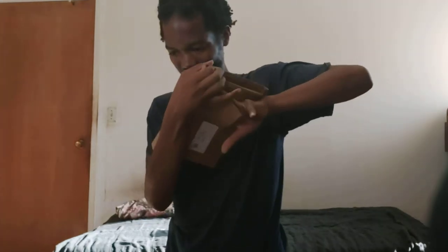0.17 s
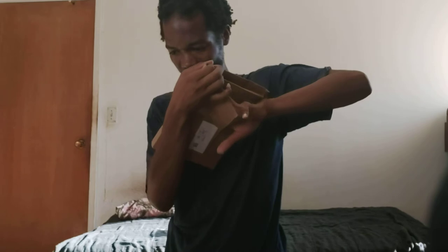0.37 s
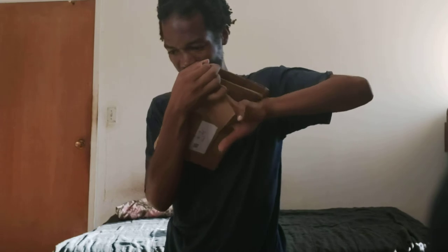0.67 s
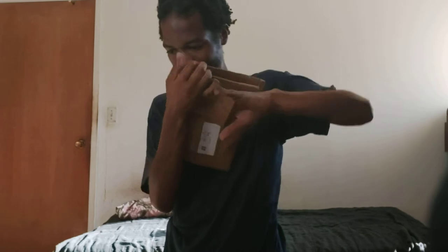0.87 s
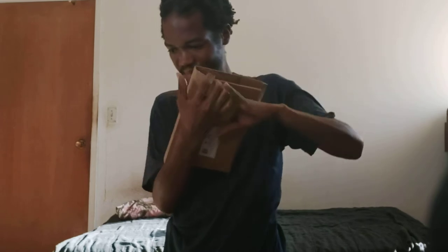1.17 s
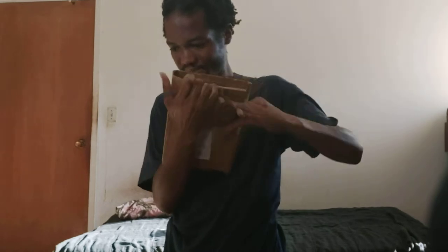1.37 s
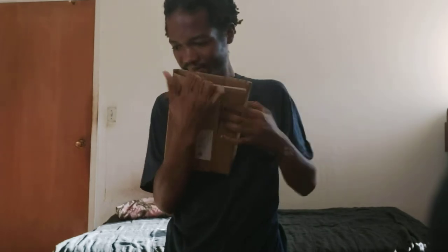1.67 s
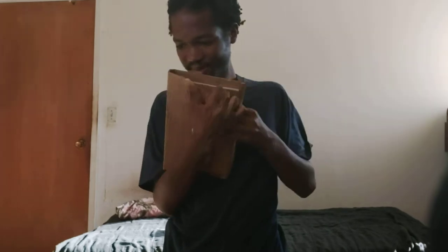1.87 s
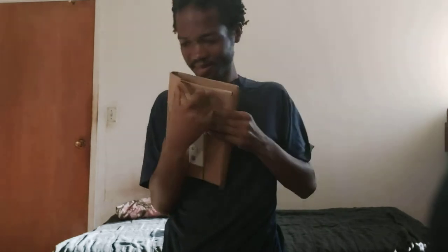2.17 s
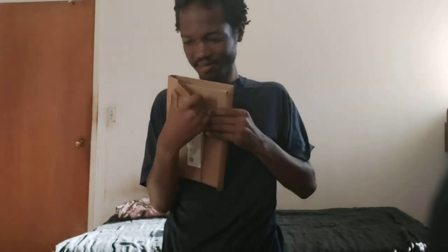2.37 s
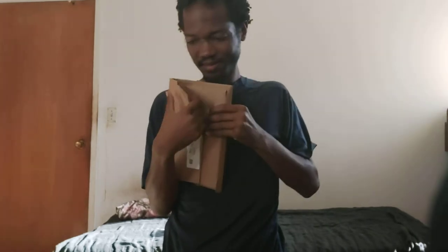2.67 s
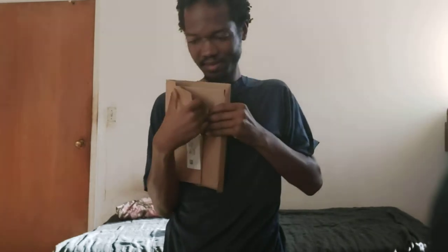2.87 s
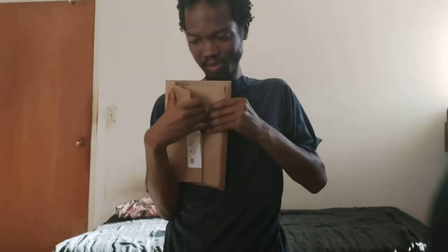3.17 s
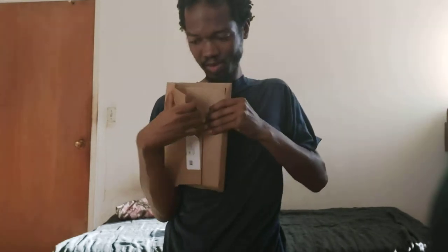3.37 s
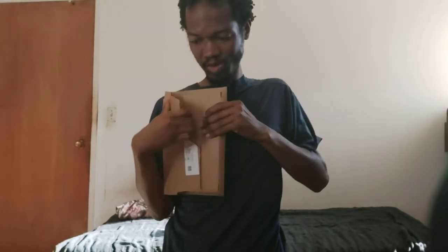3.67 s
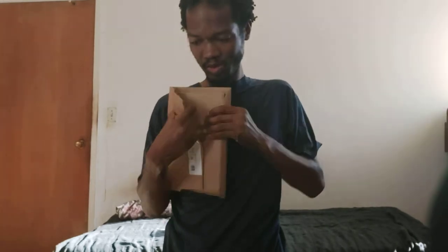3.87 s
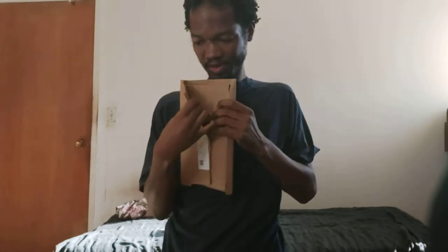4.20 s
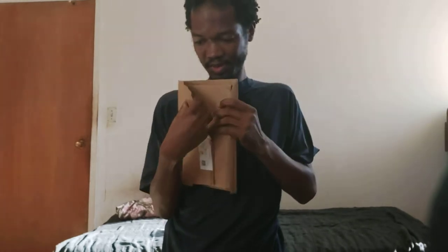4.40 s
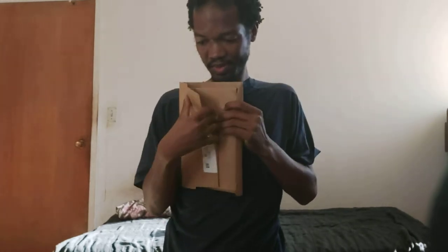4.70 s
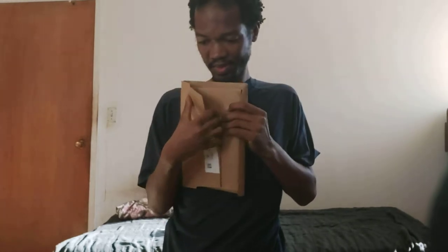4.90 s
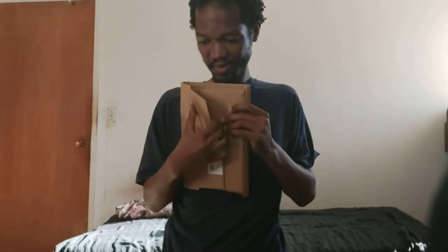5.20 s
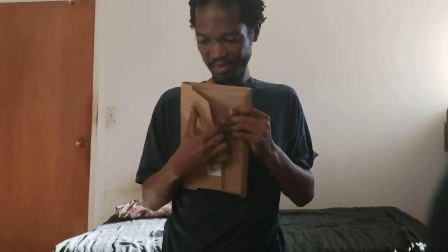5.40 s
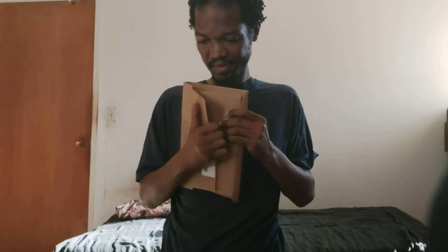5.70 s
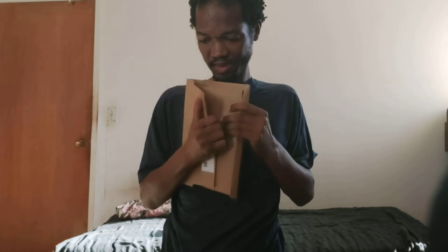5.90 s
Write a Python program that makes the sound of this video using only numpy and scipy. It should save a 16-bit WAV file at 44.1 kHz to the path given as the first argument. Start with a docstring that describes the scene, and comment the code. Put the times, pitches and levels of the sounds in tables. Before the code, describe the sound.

Stiff cardboard being worked open by hand: short fibrous rasps, dry clicks of letting-go glue and boxy low knocks from the panel, unevenly spaced with near-quiet gaps. One strong ripping burst stands out after halfway, then a hard crack, then lighter picking. The sound is mid-heavy with dulled top treble, heard at a short distance with quick wall slaps and a short room tail over low rumble, hum and hiss.

```python
"""Tearing open a cardboard mailer

Hands tear and pry at the board in a small bare-walled bedroom, two metres from a laptop microphone.
Fibres rip in swarms of tiny cracks; glue and creases let go in single snaps; the panel thumps and rustles.
Impulsive drives ring banks of resonances, and the room adds early slaps and a short tail.
Mains hum, a low rumble and hiss lie underneath."""
import sys
import numpy as np
from scipy import signal
from scipy.fft import rfft, irfft
from scipy.io import wavfile
from scipy.ndimage import uniform_filter1d

SR = 44100
rng = np.random.default_rng(int(sys.argv[2]) if len(sys.argv) > 2 else 0)


def int16_out(signal):
    """Quantize to a 16-bit WAV file."""
    q = np.round(np.clip(np.atleast_2d(signal).T, -1, 1) * 32767)
    wavfile.write(sys.argv[1], SR, q.astype(np.int16))


N = 266805

# Bending resonances of the cardboard panel: (frequency [Hz], width [Hz], level [dB])
PANEL_MODES = [(135, 50, -13), (174, 110, -9), (252, 11, -22), (338, 47, -25), (494, 24, -11),
               (566, 178, -6), (752.5, 71, -7.5), (842, 68, -6.5), (960, 130, -2.5), (1367, 430, 2.5)]


def tearing():
    """Crackling noise: one swarm of breaking fibres drives fizz, rasp and top; jolts drive the panel modes."""
    # Pulls and slides of the hands: (start [s], swell [s], hold [s], fade [s], fizz drive [dB],
    # rasp drive against fizz [dB], panel rustle drive [dB], centre of the rustle [Hz])
    hand_strokes = [(0.0, 0.00039, 0.0034, 0.027, -33.5, -11, -48, 790),
                    (0.095, 0.092, 0.085, 0.097, -31.5, -19, -58.5, 1010),
                    (0.359, 0.025, 0.075, 0.14, -43.5, -19.5, -71, 830),
                    (0.595, 0.068, 0.018, .05, -55, -19.5, -76, 816),
                    (0.731, 0.03, 0.021, 0.066, -52.5, -3.5, -45, 414),
                    (0.826, 0.043, 0.072, 0.18, -45.5, -5.5, -58, 760),
                    (1.284, 0.037, 0.061, 0.044, -45.5, -1.5, -53, 729),
                    (1.344, 0.063, .02, 0.078, -34, -9, -49.5, 680),
                    (1.544, 0.04, 0.15, 0.062, -56, -4, -54.5, 680),
                    (1.72, 0.073, 0.092, .2, -45.5, -8, -56, 800),
                    (1.966, 0.042, 0.022, 0.21, -51, -6.5, -62, 740),
                    (2.22, 0.054, 0.058, 0.068, -49, -9.5, -57, 680),
                    (2.435, 0.025, 0.012, 0.039, -63.5, -12, -73, 724),
                    (2.591, 0.052, .02, 0.13, -46.5, -6, -55, 570),
                    (2.993, 0.12, 0.077, .05, -60.5, -9.5, -74, 650),
                    (3.225, .012, 0.08, .03, -41.5, -25, -90, 800),
                    (3.311, 0.014, 0.082, 0.02, -27, -19.5, -52, 800),
                    (3.402, 0.049, 0.0079, 0.085, -17.5, -13, -35, 680),
                    (3.778, 0.07, 0.26, 0.052, -58, -5.5, -66.5, 825),
                    (4.032, 0.034, 0.052, 0.19, -48, -11.5, -66.5, 840),
                    (4.244, 0.0061, 0.029, .12, -35.5, -8.5, -40.5, 560),
                    (4.473, 0.031, 0.081, 0.055, -59, 1.5, -61, 700),
                    (4.594, 0.018, 0.008, .1, -47.5, -15, -41, 450),
                    (4.842, 0.0036, 0.0045, 0.063, -40.5, -12, -61, 740),
                    (5.01, 0.047, 0.0076, 0.046, -46, -6, -52, 530),
                    (5.202, .08, 0.0088, 0.027, -54.5, -10, -61, 600),
                    (5.34, 0.017, .01, 0.083, -51, -7.5, -57, 580),
                    (5.445, 0.039, 0.45, 0.065, -63, -4.5, -69.5, 750),
                    (5.704, 0.19, 0.074, .05, -46.5, -13, -65, 650),
                    (5.968, 0.087, .01, .05, -31, -8.5, -47.5, 650)]
    top_slope, top_offset_db = 1.366, -18.5  # the top crackle grows faster than the fizz [dB per dB], [dB]
    t = np.arange(0, N / SR, .002)
    modes_hz = np.transpose(PANEL_MODES)[0]
    power = np.zeros((3 + len(PANEL_MODES), len(t)))
    for *times, fizz_db, rasp_db, panel_db, centre_hz in hand_strokes:
        shape_db = stroke(t, *times)
        fibre_db = shape_db + fizz_db
        top_db = top_slope * fibre_db + top_offset_db
        power[:3] += gain_of([fibre_db, fibre_db + rasp_db, top_db]) ** 2
        rustle = gain_of(shape_db + panel_db) * share(modes_hz, centre_hz)[:, None]
        power[3:] += rustle ** 2
    sample_t = np.arange(N) / SR
    level = np.array([np.interp(sample_t, t, np.sqrt(row)) for row in power])
    fibres = cracks(per_s=3000, spread_db=5.0, clump_db=2.5)
    jolts = cracks(per_s=1500, spread_db=4.5, clump_db=1.5)
    return np.vstack([level[:3] * fibres, level[3:] * jolts])


def stroke(t, start, swell, hold, fade):
    """Exponential growth and decay: a level [dB] that climbs to 0, holds, and falls in straight lines."""
    edge_db = 16.5  # change over one swell or fade time (taken as at least 1 ms)
    peak = start + swell
    rise = np.maximum(peak - t, 0) / max(swell, 1e-3)
    fall = np.maximum(t - peak - hold, 0) / max(fade, 1e-3)
    return -edge_db * (rise + fall)


def cracks(per_s, spread_db, clump_db):
    """Shot noise: random tiny breaks, a few of them large, whose strength swells in clumps; unit deviation."""
    size = gain_of(spread_db * np.minimum(rng.exponential(1, N), 5))
    signed_size = size * rng.choice([-1., 1.], N)
    breaks = rng.random(N) < per_s / SR
    clump = uniform_filter1d(uniform_filter1d(rng.standard_normal(N), 300), 300)
    x = signed_size * breaks * gain_of(clump_db * clump / clump.std())
    return x / x.std()


def snaps():
    """Impulsive release: each snap cracks briefly while the panel keeps jolting several times longer."""
    # Glue and creases letting go: (time [s], crack drive [dB], rasp drive against crack [dB],
    # panel thump drive [dB], centre of the thump [Hz])
    releases = [(0.084, -49, -10, -64, 1120), (0.1114, -27, -12, -48.5, 1250),
                (0.171, -26, -7, -43.5, 1440), (0.192, -24, -23, -39.5, 1410), (0.338, -20, -34, -59, 773),
                (0.3475, -35, -6, -55, 855), (0.388, -21, -30, -76, 1090), (0.4266, -30.5, -11, -53.5, 960),
                (0.4544, -29.5, -8.5, -52, 820), (0.757, -44, 1.5, -20.5, 207), (0.961, -30, -3, -52, 970),
                (1.0107, -35, -3.5, -36.5, 397), (1.3005, -55, 11, -46, 462), (1.3207, -37, -9, -48, 840),
                (1.366, -26, -8, -58, 920), (1.567, -50, -3, -56, 797), (1.6618, -48, -6, -46.5, 810),
                (1.7677, -37, 1, -40, 970), (2.023, -38, -17, -45.5, 930), (2.254, -59, 13, -56.5, 1000),
                (2.3152, -42, -26, -37, 640), (2.57, -50, -10, -38.5, 420), (2.6362, -33.5, -4, -27, 500),
                (2.7681, -42, -15, -46.5, 510), (2.9969, -42, -5, -69, 300), (3.088, -42.5, -7, -49.5, 543),
                (3.2324, -19, -19.5, -70, 800), (3.261, -28, -11.5, -75, 740),
                (3.268, -28.5, -14.5, -80, 740), (3.3019, -32, -6, -68, 805), (3.32, -21, 3, -64, 797),
                (3.337, -12, -1, -49, 1300), (3.3707, -12.5, 4.5, -43.5, 1030),
                (3.3828, -11, -1, -35.5, 820), (3.4098, -17, 7, -33, 720), (3.4279, -8, -9, -34.5, 720),
                (3.4441, -26.5, 12, -43, 731), (3.464, -12, -3.5, -21, 323), (3.5069, -29, -3, -35.5, 846),
                (3.7978, -42, -12, -57.5, 870), (3.887, -47, 2.5, -48.5, 770),
                (4.0497, -44, -1, -51.5, 770), (4.25, -7.5, -3.5, -23, 525), (4.4805, -34, 1, -59, 581),
                (4.5462, -26, -14.5, -64, 746), (4.578, -28, -12, -69, 638), (4.625, -32.5, 6, -26, 374),
                (4.8194, -53, -3.5, -61, 736), (4.8471, -19.5, -7.5, -33, 783),
                (5.0075, -49.5, 6, -39.5, 500), (5.1267, -46, -4, -38.5, 553),
                (5.177, -37.5, -7.5, -37.5, 555.6), (5.2304, -38, -3, -34, 564),
                (5.3608, -29.5, -10, -34.5, 549.4), (5.4837, -41, -2, -47.5, 507),
                (5.7156, -50, 9, -45, 1030), (5.8312, -44.5, -4, -73, 1080), (5.8661, -38, -20, -72, 800),
                (5.9013, -61, -17, -45, 480), (5.9649, -34, -21, -48, 799), (6.0174, -37, -1, -42.5, 820),
                (6.0377, -14.5, -30, -42, 509)]
    crack_ms, thump_ms = 0.54, 4.1  # decay time constants
    top_db = -47  # top crackle drive against the crack
    length = 4096
    drive = np.zeros((3 + len(PANEL_MODES), N + length))
    modes_hz = np.transpose(PANEL_MODES)[0]
    noises = rng.standard_normal((len(releases), length))
    for (s, crack_db, rasp_db, thump_db, centre_hz), noise in zip(releases, noises):
        at = round(s * SR)
        crack = blow(noise, crack_ms * SR / 1000)
        thump = blow(noise, thump_ms * SR / 1000)
        levels_db = [[crack_db], [crack_db + rasp_db], [crack_db + top_db]]
        drive[:3, at:at + length] += crack * gain_of(levels_db)
        drive[3:, at:at + length] += thump * gain_of(thump_db) * share(modes_hz, centre_hz)[:, None]
    return drive[:, :N]


def blow(noise, samples):
    """Impulse excitation: one sharp break followed by a weaker, exponentially dying burst."""
    burst = noise * np.exp(-np.arange(len(noise)) / samples)
    burst *= np.sqrt(samples / 4) / np.linalg.norm(burst)
    burst[0] = np.sqrt(samples)
    return burst


def share(hz, centre_hz):
    """Modal coupling: how strongly a grip that favours centre_hz drives the panel mode at hz."""
    octaves = np.log2(hz / np.clip(centre_hz, 100, 2000))
    return np.exp(-.5 * (octaves / .44) ** 2)


def fibre_sound(fizz, rasp, top):
    """Resonant filtering: the crack drives ring three banks of broad treble resonances."""
    # Resonances of each bank: (frequency [Hz], width [Hz], level [dB])
    fizz_modes = [(4128, 1460, -11.5), (5860, 2600, -7.5), (6950, 1350, -8), (7870, 860, -10.5)]
    rasp_modes = [(1522, 500, -6.5), (2140, 1200, -2.5), (2821, 740, -4), (2790, 330, -24.5)]
    top_modes = [(10020, 1330, 20.6), (14300, 1900, 19.4)]
    return ring(fizz, fizz_modes) + ring(rasp, rasp_modes) + ring(top, top_modes)


def panel_sound(drives):
    """Modal superposition: each panel mode rings to its own drive, and the modes add."""
    soft = signal.butter(2, 1750, fs=SR)  # [Hz]; soft fingertips pass little treble to the panel
    modes = sum(ring(x, [mode]) for x, mode in zip(drives, PANEL_MODES))
    return signal.lfilter(*soft, modes)


def ring(x, modes):
    """Damped oscillation: parallel decaying sines; a 0 dB mode keeps the level of white noise."""
    t = np.arange(2048) / SR
    pulse = np.zeros(len(t))
    for k, (hz, width, db) in enumerate(modes):
        sign = (-1) ** k  # neighbours alternate in polarity
        unit_energy = np.sqrt(4 * np.pi * width / SR)
        decay = np.exp(-np.pi * width * t)
        pulse += sign * gain_of(db) * unit_energy * decay * np.sin(2 * np.pi * hz * t)
    return signal.oaconvolve(x, pulse)[:N]


def room(x):
    """Early reflection and reverberation: direct sound, slaps, and a short tail of changing echo pattern."""
    # Slaps off the near walls: (delay [s], level against the direct sound [dB])
    slaps = [(.006, -22.5), (.0085, -11.5), (0.014, -4), (.025, -16), (.031, -12)]
    tail_db = 3  # tail against the direct sound
    out = x.copy()
    for s, db in slaps:
        delay = round(s * SR)
        out[delay:] += gain_of(db) * x[:-delay]
    # three echo patterns trade places at constant total power, 6.1 turns per second
    turn = 2 * np.pi * 6.1 * np.arange(N) / SR
    for k in range(3):
        part = x * np.sqrt(2 / 3) * np.cos(turn + k * np.pi / 3)
        out += signal.oaconvolve(part, gain_of(tail_db) * echoes())[:N]
    return out


def echoes():
    """Diffuse decay: sparse random echoes dying at a rate set by frequency, total energy 1."""
    # Reverberation time, the time to fall by 60 dB: (frequency [Hz], time [s])
    decay_times = [(250, 0.17), (700, 0.29), (1800, 0.3), (4600, 0.22), (10000, 0.16)]
    taps = np.zeros(SR // 2)
    at = np.arange(200, len(taps) - 20, 20)
    taps[at + rng.integers(0, 20, len(at))] = rng.choice([-1., 1.], len(at))
    hz, t, z = signal.stft(taps, SR, nperseg=256)
    decay = gain_of(-60 * t / read(decay_times, hz)[:, None])
    tail = signal.istft(z * decay, SR, nperseg=256)[1]
    return tail / np.linalg.norm(tail)


def microphone(x):
    """Minimum-phase filtering: the small port colours the sound causally and cuts a deep treble notch."""
    # Response of the port without its notch: (frequency [Hz], gain [dB])
    response = [(90, -30.5), (220, -9.5), (6600, 3.5), (7600, -15.5), (9500, -24), (11200, -38.5),
                (12900, -38), (15000, -28.5)]
    # Notch added to the response: (centre [Hz], half width [Hz], gain [dB])
    notch = (12050, 350, -30)
    notch_hz, half_width, notch_db = notch
    hz = abs(np.fft.fftfreq(4096, 1 / SR))
    db = read(response, hz) + notch_db * np.exp(-((hz - notch_hz) / half_width) ** 2)
    # the phase follows from the log gain by the Hilbert transform
    spectrum = np.exp(np.conj(signal.hilbert(np.log(gain_of(db)))))
    taps = np.fft.ifft(spectrum).real[:2048]
    return signal.oaconvolve(x, taps)[:N]


def hum():
    """Harmonic series: a mains fundamental of wavering level with a steady third harmonic."""
    # Level of the fundamental: (time [s], rms level [dB])
    waver = [(0.0, -66), (0.25, -57.5), (0.59, -79), (0.99, -58.5), (1.33, -70), (1.43, -67), (1.58, -74),
             (1.94, -57), (2.42, -69), (3.25, -64), (3.35, -59.5), (4.03, -69.5), (4.63, -62.5),
             (5.09, -66), (5.32, -62), (6.05, -69)]
    mains_hz, third_db = 60, -80.5
    t = np.arange(N) / SR
    turn = 2 * np.pi * (mains_hz * t + rng.random())
    fundamental = gain_of(np.interp(t, *np.transpose(waver))) * np.sin(turn)
    third = gain_of(third_db) * np.sin(3 * turn)
    return np.sqrt(2) * (fundamental + third)  # peak from rms


def rumble_and_hiss():
    """Spectral shaping: white noise weighted in frequency, then set to an rms level of -67 dB."""
    # Spectrum of the steady noise: (frequency [Hz], relative density [dB per Hz])
    floor = [(20, -9), (45, 2.5), (80, 3), (135, -10.5), (204, -15.5), (400, -18), (830, -13.5),
             (1500, -38), (3200, -26), (4300, -15), (5700, -11.5), (7000, -36), (8500, -46), (15700, -39)]
    hz = np.fft.rfftfreq(N, 1 / SR)
    noise = irfft(rfft(rng.standard_normal(N)) * gain_of(read(floor, hz)), N)
    return gain_of(-67) * noise / noise.std()


def gain_of(db):
    """Logarithmic level: decibels to amplitude gain."""
    return 10 ** (np.asarray(db) / 20)


def read(points, hz):
    """Logarithmic pitch: interpolates a (frequency [Hz], value) table on a log-frequency axis."""
    f, value = np.transpose(points)
    return np.interp(np.log(hz + 1), np.log(f + 1), value)


def scene():
    """Linear superposition: board sounds through room and microphone port, plus the background."""
    fizz, rasp, top, *panel = tearing() + snaps()
    board = fibre_sound(fizz, rasp, top) + panel_sound(panel)
    return (microphone(room(board)) + rumble_and_hiss() + hum())[None]


def record(dry):
    """Band limiting: a linear-phase low-pass at 15750 Hz."""
    taps = signal.firwin(511, 15750, window=("kaiser", 9), fs=SR)
    return signal.oaconvolve(dry, taps[None], "same")


dry = scene()
out = record(dry)
int16_out(out)
```